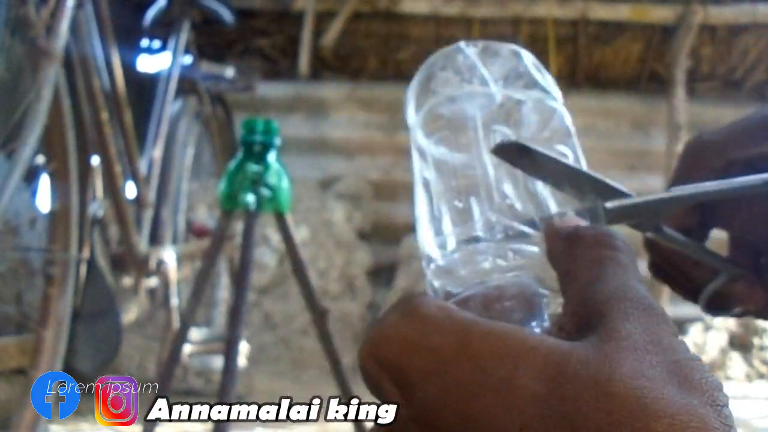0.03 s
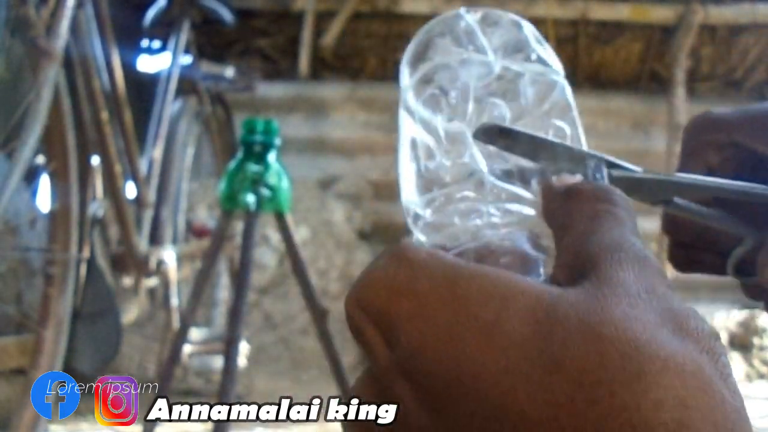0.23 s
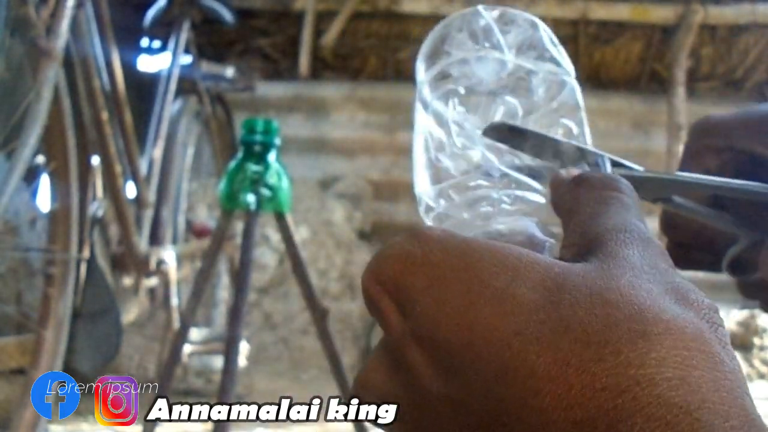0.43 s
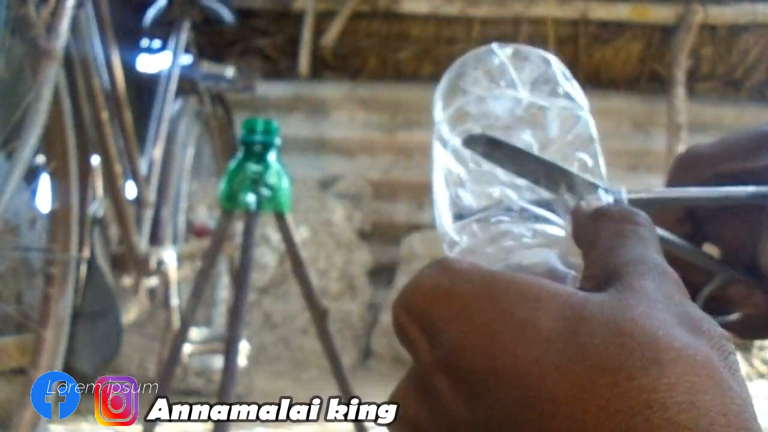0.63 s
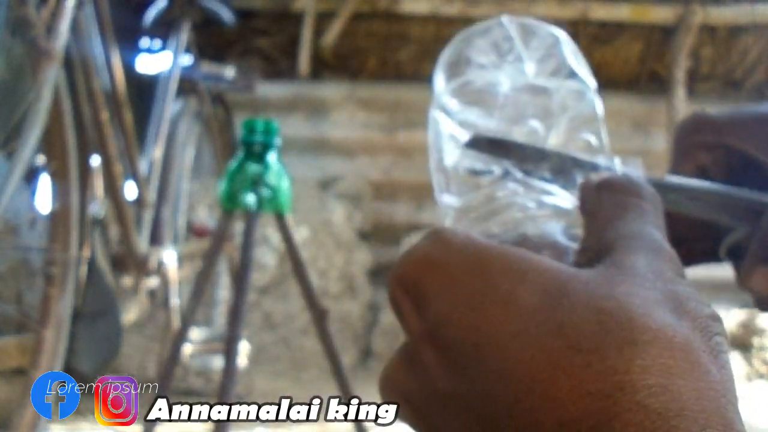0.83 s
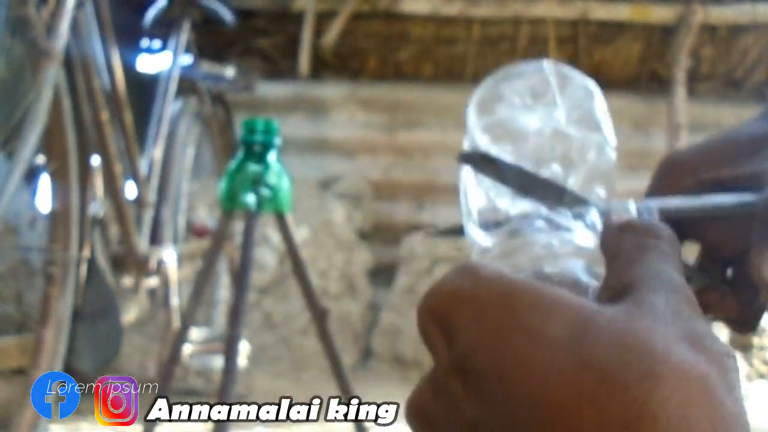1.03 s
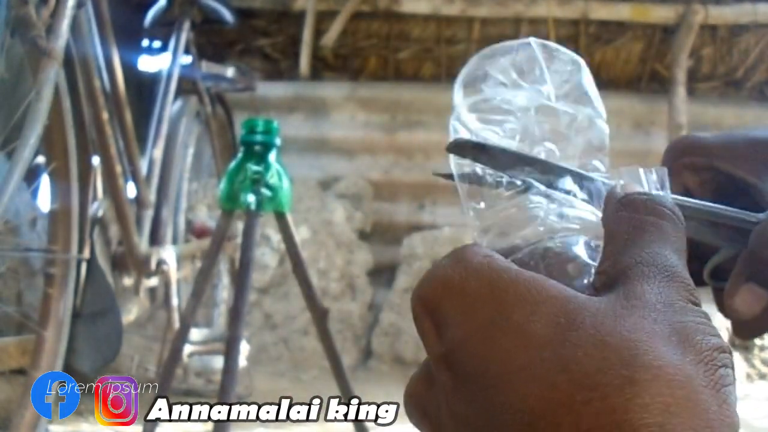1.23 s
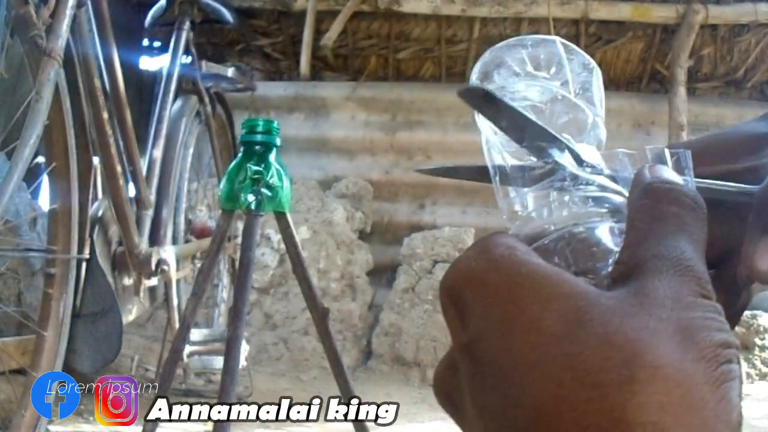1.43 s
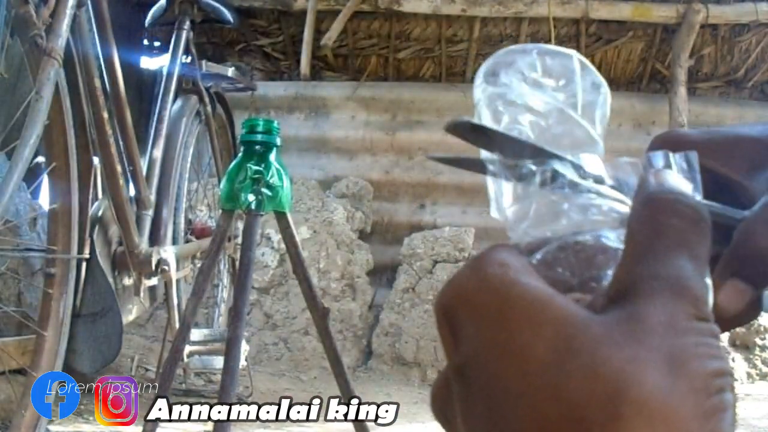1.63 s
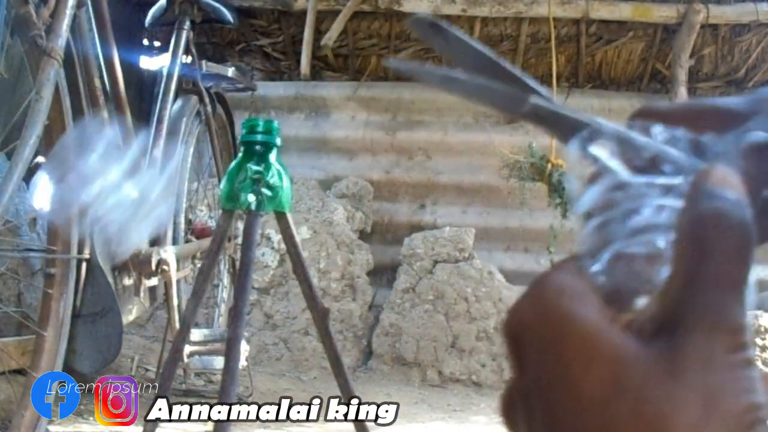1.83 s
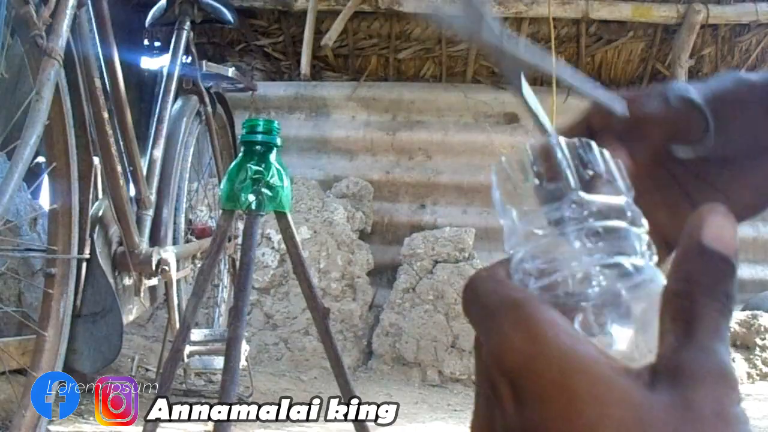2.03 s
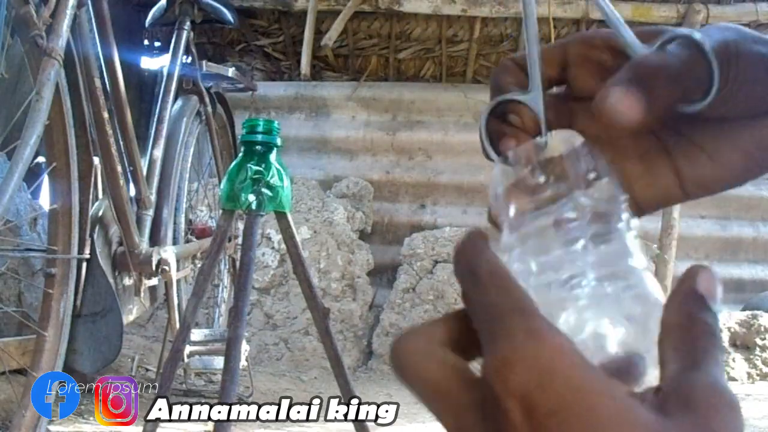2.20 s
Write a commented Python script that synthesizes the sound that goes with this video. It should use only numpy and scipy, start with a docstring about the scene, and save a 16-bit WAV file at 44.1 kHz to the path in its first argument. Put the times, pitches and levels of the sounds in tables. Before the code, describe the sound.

Close, slightly overloaded sound of scissors snipping a crisp plastic bottle: irregular crackling and loud pops, densest as the top parts, then a few hollow plastic knocks with faint metal ringing and quiet air behind.

```python
"""In a small open shed, scissors cut through a thin plastic bottle close to the microphone.
Each stroke is a rasp of random tiny fractures that excites wall resonances; the stiff wall buckles in loud
snaps, each a noise burst with three decaying panel modes, and crackles on after the hardest.
The top comes free, the steel rings faintly as a sum of modes, and hollow knocks follow.
Echoes and quiet air lie behind; the loudest sounds overload the microphone."""
import sys
import numpy as np
from scipy import signal
from scipy.fft import rfft, irfft, next_fast_len
from scipy.io import wavfile

SR = 44100
rng = np.random.default_rng(int(sys.argv[2]) if len(sys.argv) > 2 else 0)


def to_wav(s):
    """Save 16-bit WAV."""
    ch = np.atleast_2d(s).T  # columns
    pcm = np.round(np.clip(ch, -1, 1) * 32767)  # PCM
    wavfile.write(sys.argv[1], SR, pcm.astype(np.int16))


N = 99798
T = np.arange(N) / SR
HIT = T[:4096]  # time axis of one short event

# wall snaps: t/s, level/dB, middle-mode t60/s, low f/Hz, middle f/Hz, high f/Hz,
# low-mode level/dB, high-mode level/dB, crack level/dB
WALL_SNAPS = [(0.1149, -18, 0.0116, 780, 1266, 2700, 0, 3.5, -6),
              (0.1168, -15.5, 0.012, 860, 1280, 2090, -6.5, 1, -33),
              (0.1575, -20.5, 0.007, 496, 1370, 2700, -7.5, 20, 6.5),
              (0.165, -18.5, 0.02, 486, 1090, 2385, -8.5, -7, -24),
              (0.358, -7.5, 0.00884, 464, 1420, 2090, -8.5, -1, -17.5),
              (0.4086, -9.5, 0.024, 915, 1577, 2253, 2.5, 7.5, 5.5),
              (0.4101, -11.5, 0.023, 766, 1380, 3235, -4.5, 9, 0.5),
              (.6980, -15.5, 0.013, 522, 1283, 2015, -5.5, 3, -11),
              (0.9784, -9, 0.0097, 682, 1590, 2455, -11.5, -7.5, -25.5),
              (1.2375, -9, 0.014, 357, 1225, 2165, -15, 10.5, 4.5),
              (1.2398, -11.5, 0.014, 817, 2080, 3250, -0.5, 8.5, 2.5),
              (1.2543, -17, 0.024, 736, 1242, 2700, -1.5, 7, 6),
              (1.3296, -10, 0.013, 1450, 2070, 3350, -1, 2.5, -4),
              (1.3307, -13.5, 0.025, 727, 856, 1520, -7, -15, -2),
              (1.5381, -29, 0.0095, 1000, 2940, 3280, 0.5, 11.5, 3.5),
              (1.6282, -10.5, 0.041, 716, 1368, 2420, -8, -11, -9),
              (1.6302, -14.5, 0.032, 890, 1316, 2710, 3.5, -6, -13.5),
              (1.7210, -8, 0.041, 943, 1346, 2600, -14, -13.5, -5),
              (1.7383, -3, 0.024, 257, 1040, 3040, -22.5, 0, -1.5),
              (1.7450, -12.5, 0.013, 1047, 1410, 1880, 10, -1.5, 1),
              (1.7491, -12.5, 0.021, 942, 1510, 2770, -3, -21, -4),
              (1.8704, -14.5, 0.017, 270, 978, 2070, -14, -2, -11.5),
              (1.9512, -7, 0.019, 1177, 1920, 2820, 5, 5, 2)]
# spectrum of tearing plastic: f/Hz, level/dB
CRACK_SPECTRUM = [(60, -33.5), (400, -12), (900, 0.5), (2000, 3), (3300, 6.5), (5000, -13), (6200, -14.5),
                  (8000, -6), (10000, -27), (14000, -15.5), (17000, -7.5)]
# creased wall after hard snaps: t/s, level/dB, die-away t60/s
CRACKLE_RUNS = [(.165, -39.5, 0.21), (.414, -24, 0.055), (1.243, -11, 0.071), (1.742, -9.5, 0.05),
                (1.954, -36, 0.051)]
# puffs of air from the hardest snaps: t/s, peak level/dB, time to peak/s
AIR_PUFFS = [(0.4102, -13.5, 0.00043), (1.2378, -33, 0.000134), (1.63, -23.5, 0.00016),
             (1.742, -17, 0.00028), (1.951, -40, 0.00035)]
# cutting strokes: start t/s, rise/s, hold/s, release/s, level/dB, wall f/Hz, rasp tilt/(dB/octave)
CUTTING_STROKES = [(0.131, 0.023, 0.022, 0.038, -36.5, 390, -0.5),
                   (0.202, 0.023, 0.019, 0.12, -45, 432, 2.5),
                   (0.331, 0.0077, 0.013, 0.016, -39.5, 446, -24),
                   (0.409, 0.0025, 0.016, 0.25, -40.5, 820, 0.5),
                   (0.479, 0.0123, 0.04595, 0.041, -30, 628, 1),
                   (0.644, 0.0076, 0.0707, 0.052, -40.5, 500, 1),
                   (0.755, 0.0088, 0.05, 0.019, -34.5, 520, 1), (0.928, 0.017, 0.039, 0.0058, -37, 645, 2),
                   (0.966, 0.039, 0.021, 0.036, -25.5, 730, 2), (1.12, 0.024, 0.094, 0.0092, -40, 654, 1.5),
                   (1.273, .005, 0.023, 0.031, -49, 760, 2), (1.384, 0.0133, 0.055, 0.064, -32.5, 923, 1.5),
                   (1.53, 0.0066, 0.14, 0.018, -40.5, 917, -0.5)]
# spectrum of the cutting rasp: f/Hz, level/dB
RASP_SPECTRUM = [(100, -14.5), (350, -8.5), (550, -1), (1060, 3), (1400, 8), (2370, -1), (3300, 1),
                 (4300, -11.5), (5770, -21.5), (7800, -14), (10000, -32), (13800, -24.5), (16000, -24.5)]
# small ticks at the blade edge: t/s, level/dB, tilt/(dB/octave)
EDGE_TICKS = [(0.0909, -38.5, -2), (0.2354, -32, -4), (0.2577, -26.5, -27), (0.337, -29.5, -3),
              (0.3486, -35.5, 5), (0.4222, -17.5, 1.5), (0.470, -27.5, -4), (0.4894, -22, -9),
              (.4925, -23, -9.5), (0.508, -25, -7), (0.532, -22, -1.5), (0.666, -28.5, -4),
              (0.682, -26.5, -7.5), (0.7312, -35, 2), (.7660, -22.5, -8), (.7950, -17, -1),
              (0.801, -17, -3.5), (0.8253, -32.5, -2.5), (.852, -42.5, -2), (.894, -49.5, -5),
              (.9300, -41, 1), (0.934, -36, -2), (0.9468, -23.5, 0.5), (0.9620, -15, -0.5),
              (1.0021, -22.5, -0.5), (1.0195, -21, -0.5), (1.139, -32.5, -5.5), (1.156, -33, 0.5),
              (1.1830, -22, -1.5), (1.224, -22, -4), (1.2338, -23, -1.5), (1.305, -39, 0),
              (1.3267, -31.5, -4), (1.394, -34, -5), (1.406, -22, -0.5), (1.549, -30, -3),
              (1.6272, -22, 1.5), (1.7130, -29, -6.5), (1.8674, -30.5, -9)]
# hollow knocks of the freed piece: t/s, level/dB, main f/Hz, onset t60/s, ring t60/s,
# other modes' level/dB, crack level/dB
SHELL_KNOCKS = [(1.826, -34, 1190, 0.0042, 0.0196, 12, -16), (2.0770, -7.5, 1471, 0.0058, 0.028, 0, -21),
                (2.0830, -19, 1406, 0.001, 0.072, 5, -18), (2.086, -19, 1065, 0.0011, 0.034, 4, -25.5),
                (2.115, -7, 1354, 0.0028, 0.021, 4, -31), (2.1189, 0.5, 1087, 0.0073, 0.018, -21, -48),
                (2.1265, -20.5, 1467, 0.0058, 0.054, 2, -8.5), (2.176, -48, 375.6, 0.0026, 0.35, -6, -12),
                (2.2100, -23.5, 1300, 0.0024, 0.025, 1, -19)]
# modes of the open shell: f/main f, level/dB
SHELL_MODES = [(0.4, -16), (.8, -14), (1, 2), (1.14, -12), (1.399, -12), (1.948, -22)]
# blows on the blades: t/s, low-mode level/dB, high-partial level/dB
BLADE_BLOWS = [(1.2372, -35, -80), (1.738, -28.5, -60), (1.95, -39, -69), (2.076, -37, -57),
               (2.114, -50, -54), (2.129, -27.5, -65.5)]
# low modes of the steel: mean f/Hz, level/dB, t60/s
BLADE_MODES = [(1082, 7, 0.14), (1104, -10.5, 0.55), (1425, -12.5, 0.58), (1850, -14, 0.17),
               (2062, -10.5, 0.25), (2950, -30, 0.17)]
# thin high partials of the steel: f/Hz, level/dB, t60/s
BLADE_PARTIALS = [(6730, -8, .12), (8000, -4, 0.17), (8000, -13, .2), (8930, 4, 0.094), (9560, 6.5, .12),
                  (9938, 6, .16), (12110, 11.5, .14), (13100, -6, .17), (14320, -8, .14)]
# dense shimmer around the low steel modes: f/Hz, level/dB
SHIMMER_SPECTRUM = [(100, -60), (780, -10.5), (1100, 11), (1500, -2), (2100, -7), (3300, -18),
                    (5500, -30.5), (9000, -30.5), (16000, -32)]
# spectrum of the echoes: f/Hz, level/dB
ECHO_SPECTRUM = [(60, -13.5), (300, -1.5), (1000, -2.5), (3000, -5), (6000, -2), (16000, -7.5)]
# spectrum of the quiet air: f/Hz, level/dB
AIR_SPECTRUM = [(25, 4), (60, 0.5), (150, -5), (400, -5), (800, -7.5), (1400, -8), (3000, -15.5),
                (5000, -25.5), (8000, -33), (16000, -35.5)]
# microphone response: f/Hz, level/dB
MIC_RESPONSE = [(20, -1), (9600, -2), (10300, -11.5), (10900, -46.5), (11500, -22.5), (12200, -10.5),
                (13000, -1), (20000, -25)]

# panels: a mode starts flat by the share BEND and settles with time constant BEND_S
BEND, BEND_S = 0.071, 0.001
TWIN_DB, TWIN_SPREAD = -25.5, 0.037  # weaker neighbour of each mode; spread as a share of f
LINGER_DB, LINGER_T60_S = -43.5, 0.067  # faint longer ring of each mode
RING_FALL = 0.63  # exponent by which higher modes die sooner
LOW_CUT_RATIO = 0.49  # radiation cut-off over low-mode f
SNAP_CRACK_T60_S, KNOCK_CRACK_T60_S, TICK_T60_S = 0.015, 0.066, 0.012

# creases: each ring falls by 60 dB in CREASE_CYCLES of its own pitch
CREASES_PER_S, CREASE_SPREAD_DB, CREASE_CYCLES = 800, 4, 16
CREASE_LOW_HZ, CREASE_HIGH_HZ, CREASE_CLICK_DB = 948, 3920, -8.5

# strokes: the edge catches and slips in swells one CATCH_S apart
FRACTURES_PER_S, FRACTURE_SPREAD_DB = 3200, 1.5
CATCH_S, CATCH_DB = 0.00484, 3.5
STROKE_CREASE_DB, STROKE_RASP_DB = -5, -3
WALL_DB, WALL_T60_S = -4.5, 0.029
SECOND_WALL_RATIO, SECOND_WALL_DB = 1.571, -8.5
DULL_HZ, EDGE_POWER = 1500, 1.32  # above DULL_HZ the sound grows as effort ** EDGE_POWER

# steel
SHIMMER_DB, SHIMMER_T60_S = -0.5, 0.12
TING_ROUGH, TING_FLUTTER_S = 1.6, 0.004  # relative flutter depth, step

# echoes and background
ECHO_DELAY_S = 0.0067
EARLY_DB, EARLY_T60_S, ROOM_DB, ROOM_T60_S = -17.5, 0.1, -29, 0.217
PARTED_S, PARTED_CUT_HZ = 1.9, 1000  # once the top is gone, the echoes lose their low end
AIR_DB, TONE_HZ, TONE_WIDTH_HZ, TONE_DB = -56, 1420, 21, -65

# microphone
CLIP_LEVEL, CLIP_SKEW, TOP_HZ = 0.78, 0.0043, 16200


def snaps():
    """Buckling: sudden release of bending energy gives a crack and three short panel modes."""
    out = np.zeros(N)
    for at, db, t60, low, mid, high, low_db, high_db, crack_db in WALL_SNAPS:
        body = undb(crack_db) * crack(SNAP_CRACK_T60_S)
        # the middle mode starts in opposite phase
        for hz, gain in ((low, undb(low_db)), (mid, -1), (high, undb(high_db))):
            ring_t60 = t60 * (mid / hz) ** RING_FALL
            twin_hz = hz * (1 + TWIN_SPREAD * rng.uniform(-0.76, 1))
            panel = bent_mode(hz, ring_t60)
            twin = undb(TWIN_DB) * mode(HIT, twin_hz, ring_t60)
            linger = undb(LINGER_DB) * mode(HIT, hz, LINGER_T60_S)
            body = body + gain * (panel + twin + linger)
        add(out, at, undb(db) * radiate(body, LOW_CUT_RATIO * low))
    return out


def bent_mode(hz, t60):
    """Stiffening: a panel resonance slides up to its pitch as the wall settles."""
    phase_time = HIT - BEND * BEND_S * (1 - np.exp(-HIT / BEND_S))
    return np.sin(2 * np.pi * hz * phase_time) * fade(HIT, t60)


def crack(t60, tilt_db=0):
    """Tearing: a short burst of coloured noise with exponential decay."""
    noise = rng.standard_normal(len(HIT))
    burst = colour(noise * fade(HIT, t60), CRACK_SPECTRUM, tilt_db)
    return burst / np.std(colour(noise, CRACK_SPECTRUM, tilt_db))


def crackles():
    """Relaxation: after a hard snap the creased wall gives way in a run that dies away."""
    out = np.zeros(N)
    for at, db, t60 in CRACKLE_RUNS:
        run = radiate(creases(len(HIT)), CREASE_LOW_HZ)
        add(out, at, undb(db) * run * fade(HIT, t60))
    return out


def creases(count):
    """Successive yielding: each crease gives a click and a short ring of its own pitch."""
    rings, clicks = np.zeros(count), np.zeros(count)
    for k, (when, pitch, strength) in enumerate(rng.random(size=(300, 3))):
        i = int((k + when) / CREASES_PER_S * SR)
        if i < count:
            hz = CREASE_LOW_HZ * (CREASE_HIGH_HZ / CREASE_LOW_HZ) ** pitch
            sign = (-1) ** k
            size = sign * undb(-CREASE_SPREAD_DB * np.log(max(strength, 0.03)))
            grain_time = HIT[:min(count - i, 1024)]
            grain = size * mode(grain_time, hz, CREASE_CYCLES / hz)
            rings[i:i + len(grain)] += grain
            clicks[i] += size
    return unit(rings) + undb(CREASE_CLICK_DB) * unit(colour(clicks, CRACK_SPECTRUM))


def puffs():
    """Volume displacement: the wall jumps and pushes a pulse of air at the microphone."""
    out = np.zeros(N)
    for at, db, length in AIR_PUFFS:
        pulse = HIT / length * np.exp(1 - HIT / length)
        add(out, at, undb(db) * pulse)
    return out


def cutting():
    """Forced vibration: random fractures and creases drive the wall and brighten with effort."""
    out, t = np.zeros(N), T[:N // 8]
    for at, rise, hold, release, db, wall_hz, tilt_db in CUTTING_STROKES:
        size_db = FRACTURE_SPREAD_DB * np.minimum(rng.exponential(size=len(t)), 4)
        impulses = undb(size_db) * rng.choice([-1, 1], len(t))
        happens = rng.random(len(t)) < FRACTURES_PER_S / SR
        swells = undb(CATCH_DB * flutter(len(t), CATCH_S))
        rasp = unit(colour(impulses * happens * swells, RASP_SPECTRUM, tilt_db))
        wall = undb(WALL_DB) * resonate(rasp, wall_hz, WALL_T60_S)
        wall += undb(SECOND_WALL_DB) * resonate(rasp, SECOND_WALL_RATIO * wall_hz, WALL_T60_S)
        tearing = undb(STROKE_RASP_DB) * rasp + undb(STROKE_CREASE_DB) * creases(len(t))
        sound = radiate(tearing + wall, wall_hz)
        effort = np.interp(t, np.cumsum([0, rise, hold, release]), [0, 1, 1, 0])
        dull = signal.sosfiltfilt(signal.butter(2, DULL_HZ, fs=SR, output="sos"), sound)
        bright = sound - dull
        add(out, at, undb(db) * (effort * dull + effort ** EDGE_POWER * bright))
    return out


def ticks():
    """Brittle fracture: single small bursts ahead of the blades."""
    out = np.zeros(N)
    for at, db, tilt_db in EDGE_TICKS:
        add(out, at, undb(db) * crack(TICK_T60_S, tilt_db))
    return out


def knocks():
    """Modal ringing: a blow on the open plastic shell excites modes in fixed ratios."""
    out = np.zeros(N)
    for at, db, hz, contact, t60, others_db, crack_db in SHELL_KNOCKS:
        ring = np.zeros(len(HIT))
        for ratio, mode_db in SHELL_MODES:
            level_db = mode_db + others_db * (ratio != 1)
            ring += undb(level_db) * mode(HIT, hz * ratio, t60)
        ring *= 1 - fade(HIT, contact)  # soft onset
        body = ring + undb(crack_db) * crack(KNOCK_CRACK_T60_S, tilt_db=-6)
        add(out, at, undb(db) * radiate(body, 390))
    return out


def steel():
    """Free vibration: struck blades ring in low modes, a dense shimmer and a thin high ting."""
    out = np.zeros(N)
    for at, db, ting_db in BLADE_BLOWS:
        ring, ting = np.zeros(N), np.zeros(N)
        for hz, mode_db, t60 in BLADE_MODES:
            ring += undb(mode_db) * mode(T, hz + rng.normal(0, 1.5), t60)
        for hz, mode_db, t60 in BLADE_PARTIALS:
            chatter = 1 + TING_ROUGH * flutter(N, TING_FLUTTER_S)  # blade against blade
            ting += undb(mode_db) * mode(T, hz, t60) * chatter
        shimmer = unit(colour(rng.standard_normal(N // 4), SHIMMER_SPECTRUM))
        shimmer *= fade(T[:N // 4], SHIMMER_T60_S)
        add(out, at, undb(db) * ring + undb(ting_db) * ting)
        add(out, at, undb(db + SHIMMER_DB) * shimmer)
    return out


def reflections(x, t60, db):
    """Diffuse reflection: scattered echoes in the bottle and from nearby surfaces, as decaying noise."""
    t = T[:N // 4]
    tail = rng.standard_normal(len(t)) * fade(t, t60) * (t > ECHO_DELAY_S)
    response = colour(tail / np.linalg.norm(tail), ECHO_SPECTRUM)
    return undb(db) * signal.fftconvolve(x, response)[:N]


def background():
    """Stationary noise: quiet air, and narrow-band noise heard as a faint wavering tone."""
    tone_t60 = np.log(1000) / (np.pi * TONE_WIDTH_HZ)  # bandwidth sets the decay
    tone = resonate(rng.standard_normal(N), TONE_HZ, tone_t60)
    air = unit(colour(rng.standard_normal(N), AIR_SPECTRUM))
    return undb(AIR_DB) * air + undb(TONE_DB) * tone


def radiate(x, hz):
    """Radiation efficiency: a thin wall radiates little below its lowest resonance."""
    return signal.sosfilt(signal.butter(2, hz, "high", fs=SR, output="sos"), x)


def resonate(x, hz, t60):
    """Resonance: convolution with one decaying mode, scaled to rms 1."""
    return unit(signal.fftconvolve(x, mode(HIT, hz, t60))[:len(x)])


def mode(t, hz, t60):
    """Damped oscillation: one decaying sine."""
    return np.sin(2 * np.pi * hz * t) * fade(t, t60)


def fade(t, t60):
    """Exponential damping: a fall of 60 dB in t60 seconds."""
    return np.exp(-np.log(1000) * t / max(t60, 1e-4))


def flutter(count, step_s):
    """Random modulation: straight lines between normal values, one every step."""
    return np.interp(T[:count] / step_s, np.arange(count), rng.standard_normal(count))


def colour(x, points, tilt_db=0):
    """Minimum-phase filtering: a causal response through (f/Hz, level/dB) points, tilted per octave."""
    size = 2 * next_fast_len(len(x))
    octave = np.log2(np.maximum(np.arange(size // 2 + 1) * SR / size, 1))
    hz, db = np.array(points, float).T
    slope_db = tilt_db * (np.clip(octave, 9, 13) - 11)  # pivots at 2048 Hz
    cepstrum = irfft(np.log(undb(np.interp(octave, np.log2(hz), db) + slope_db)))
    # fold onto positive time
    cepstrum[1:size // 2] *= 2
    cepstrum[size // 2 + 1:] = 0
    return irfft(rfft(x, size) * np.exp(rfft(cepstrum)))[:len(x)]


def undb(db):
    """Logarithmic level: decibels to amplitude gain."""
    return 10 ** (np.asarray(db) / 20)


def unit(x):
    """Normalisation: scale to rms 1."""
    return x / np.sqrt(np.mean(x ** 2) + 1e-18)


def add(out, at, x):
    """Superposition: mix x in at a time in seconds."""
    i = max(int(at * SR), 0)
    out[i:i + len(x)] += x[:max(N - i, 0)]


def scene():
    """Superposition of bottle and scissors, their echoes and a quiet background."""
    near = snaps() + crackles() + cutting() + ticks() + knocks() + steel()
    parted = np.clip((T - PARTED_S) / 0.02, 0, 1)
    thinned = radiate(radiate(near, PARTED_CUT_HZ), PARTED_CUT_HZ)
    source = (1 - parted) * near + parted * thinned
    early = reflections(source, EARLY_T60_S, EARLY_DB)
    late = reflections(source, ROOM_T60_S, ROOM_DB)
    return (near + puffs() + early + late + background())[None]


def record(dry):
    """Saturation: the microphone clips a little unevenly, has a treble notch, and the top is cut."""
    x = dry[0] / CLIP_LEVEL
    x = x / (1 + x ** 6) ** (1 / 6)
    uneven = CLIP_LEVEL * (x + CLIP_SKEW * x ** 2)
    heard = colour(uneven, MIC_RESPONSE)
    top_cut = signal.ellip(8, 0.2, 70, TOP_HZ, fs=SR, output="sos")
    return signal.sosfilt(top_cut, heard)[None]


dry = scene()
out = record(dry)
to_wav(out)
```